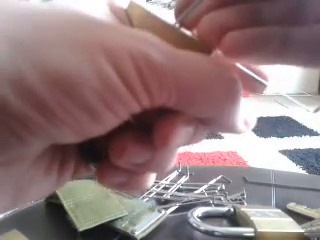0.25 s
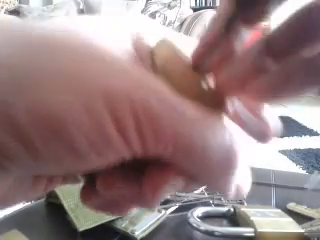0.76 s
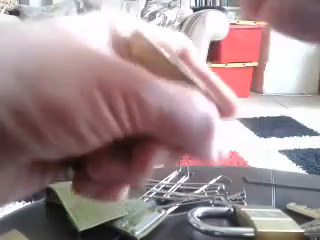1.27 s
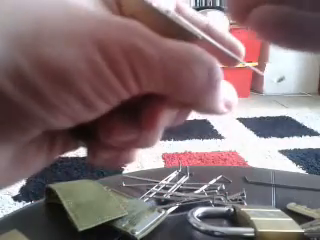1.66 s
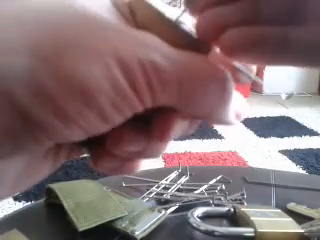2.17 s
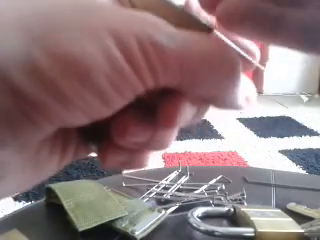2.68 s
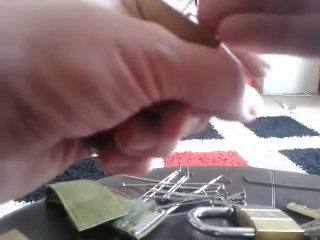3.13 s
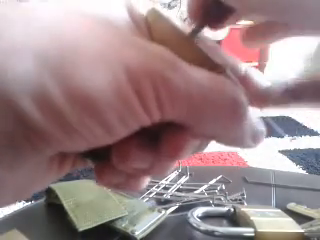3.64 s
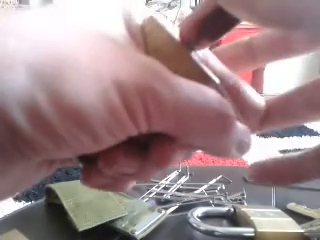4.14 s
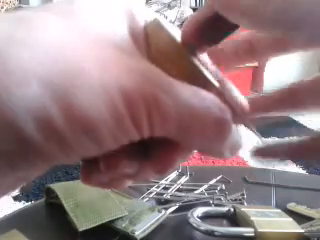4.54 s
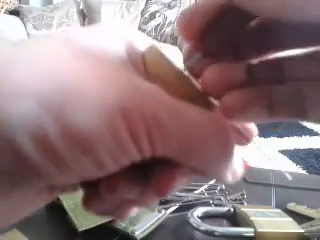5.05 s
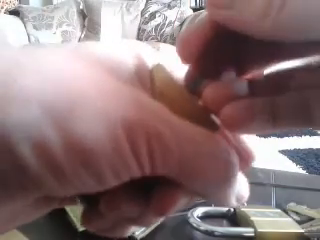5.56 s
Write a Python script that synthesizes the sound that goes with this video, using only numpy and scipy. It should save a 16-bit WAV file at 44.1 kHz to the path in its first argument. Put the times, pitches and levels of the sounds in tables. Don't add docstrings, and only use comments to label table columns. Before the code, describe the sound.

Steady soft hiss with faint low rumble and a barely audible hum runs throughout, from a cheap, band-limited microphone close to a padlock in a small room. The first second has only faint ticks at 0.3, 0.6 and 1.0. At 1.25 a tight cluster of tiny clicks and a light scrape leads to a crisp metallic snap at 1.5 and a cleaner one at 1.7. Light ticks come at 2.0-2.1, a snap at 2.44, clicks at 2.7 and a thin steel tick at 2.98. The background murmur swells slightly around 2.9 and a very faint distant engine slowly rises until 5.2. Rattling, scraping and a tiny squeak fill 3.35-3.65, with a firm click at 3.6. After a pause, clicks come at 4.5 and 4.85, with minute chirps. The loudest, very short bright snap hits at 5.03; small clicks follow at 5.2, then a strong double click at 5.45, then hiss.

```python
import sys
import numpy as np
from scipy import signal
from scipy.fft import rfft, irfft
from scipy.io import wavfile
from scipy.ndimage import uniform_filter1d

SR = 44100
rng = np.random.default_rng(int(sys.argv[2]) if len(sys.argv) > 2 else 0)


def log_audio(samples):
    frames = np.atleast_2d(samples).T
    limited = np.clip(frames, -1, 1)
    pcm = np.round(limited * 32767).astype(np.int16)
    wavfile.write(sys.argv[1], SR, pcm)


def natural_amplitude(level_db):
    exponent = np.asarray(level_db, float) / 20
    return 10 ** exponent


N = 256220

# pitch_hz, level_db (per Hz)
HISS_SPECTRUM = [(65, -54), (150, -12.5), (295, -3.5), (643, -1.5), (1790, -6), (6900, -11.5),
                 (7300, -20.5), (9000, -37)]
# pitch_hz, level_db (per Hz)
RUMBLE_SPECTRUM = [(3, -6), (22, -3.5), (45, -6), (56, -15.5), (70, -10), (80, -11.5), (92, -28.5),
                   (110, -50)]
# start_s, level_db, pitch_hz, chatter_ms
BODY_SLIPS = [(.266, -55, 1380, 3.7), (.6064, -51.5, 1510, 2.3), (1.035, -54, 1710, 2.3),
              (1.204, -56.5, 2390, 2.7), (1.248, -51.5, 2060, 5.7), (1.259, -55, 1300, 3.8),
              (1.265, -55, 1290, 1.3), (1.4983, -56, 2200, 1.1), (2.017, -55, 2300, 2.5),
              (2.1053, -54.5, 1260, 1.1), (2.429, -61, 1440, 4.1), (2.703, -46, 1450, 2.6),
              (2.704, -58, 2200, 1.8), (3.357, -51, 2390, 2.5), (3.395, -56, 1070, 3.2),
              (3.617, -42.5, 1790, 3.3), (3.6451, -49.5, 2040, 3.1), (4.459, -54, 1630, 1.4),
              (4.497, -58, 2250, 2.1), (4.5107, -53, 1840, 3.1), (4.5287, -47.5, 1870, 1.1),
              (4.856, -56.5, 1320, 4.8), (5.191, -47.5, 1850, 3.1), (5.192, -53, 1390, 1.7),
              (3.358, -53, 1500, 2.5), (1.252, -65, 1500, 3.9), (5.198, -53.5, 1930, 4.6),
              (5.4436, -41, 1910, 3.1), (5.4625, -31.5, 1820, 1.5)]
# start_s, level_db, pitch_hz, chatter_ms
PIN_SLIPS = [(1.247, -47, 2830, 6.5), (1.252, -43.5, 3850, 2.5), (1.259, -44.5, 3000, 3.6),
             (1.265, -52, 2980, 1.3), (1.4983, -44, 3760, 1.2), (2.017, -55.5, 3870, 2.4),
             (2.102, -58, 3860, 1.3), (0.6057, -59, 2820, 2.3), (2.703, -43, 3400, 1.1),
             (2.7087, -54, 2830, 1.6), (2.979, -53, 3600, 1.4), (3.357, -49, 3250, 2.7),
             (3.437, -55, 3360, 2.2), (3.456, -55.5, 3240, 4.4), (3.6182, -42, 3380, 3.2),
             (3.6192, -47, 4400, 1.2), (1.254, -57, 4600, 4.9), (3.647, -53, 3300, 5.1),
             (4.4604, -51.5, 3320, 1.3), (4.496, -57, 4170, 2.6), (4.5107, -50, 3300, 2.3),
             (4.5293, -52, 4430, 1.2), (4.848, -57, 3550, 3.1), (4.871, -57, 3450, 1.4),
             (4.889, -54.5, 3450, 3.6), (5.014, -55, 3400, 2.6), (5.022, -49.5, 3300, 1.1),
             (5.194, -70, 2500, 2.8), (5.4438, -54, 2920, 2.5)]
# start_s, level_db, pitch_hz, chatter_ms
PICK_SLIPS = [(1.248, -52.5, 6400, 6.6), (1.252, -57, 5100, 2.1), (1.4972, -53, 6000, 2.6),
              (2.017, -54.5, 6830, 2.1), (2.101, -50.5, 6350, 0.89), (2.1049, -52.5, 6800, 1.6),
              (2.318, -59.5, 6450, 8.9), (2.429, -58, 6600, 4.1), (2.703, -50, 6540, 1.8),
              (2.7082, -47, 6370, 1.4), (2.73, -56, 7100, 3.9), (2.979, -44, 6680, 2.6),
              (3.357, -49, 6620, 2.9), (3.373, -59, 6400, 5.2), (3.4375, -48, 6580, 2.9),
              (3.446, -52, 6600, 2.3), (3.615, -51, 5550, 2.8), (3.48, -58, 6540, 4.6),
              (3.607, -54, 5640, 1.9), (3.608, -52.5, 6640, 8.7), (4.4608, -52.5, 5740, 1.4),
              (4.496, -54, 6950, 2.3), (4.511, -52, 6600, 2.6), (4.5295, -49, 5400, 1.4),
              (4.849, -50.5, 5370, 2.8), (4.871, -46.5, 6470, 1.2), (4.947, -59, 6620, 2.1),
              (5.116, -57, 6400, 1.8), (5.19, -54.5, 6400, 3), (5.4434, -59, 6640, 2.5)]
# delay_ms, level_db
WALL_ECHOES = [(8, -20), (14.5, -25.5), (17.5, -16.5), (22.5, -37.5)]
# start_s, length_s, centre_hz, level_db
SCRAPES = [
    (1.243, 0.077, 4600, -65),
    (1.511, 0.049, 6270, -63),
    (2.701, 0.023, 6200, -64),
    (3.402, 0.097, 6600, -66.5),
    (3.529, .004, 5500, -60),
    (3.541, 0.0037, 6000, -59),
    (3.603, 0.044, 4400, -62),
    (4.85, .05, 5600, -66),
    (5.195, 0.015, 5550, -61.5),
]
# start_s, level_db, chatter_ms, rebound_ms, rebound_db
SNAPS = [
    (1.5001, -31, 3.6, 1.41, -17),
    (1.6898, -35.5, 1.3, 1.08, -12),
    (2.4413, -37, 1.3, .75, 10),
    (5.0256, -13, 0.69, 0.62, -21),
    (5.46, -29.5, 2.8, .6, 11),
]
# pitch_hz, width_hz, level_db
LOOSE_GRIP_MODES = [
    [(1300, 780, -7), (1750, 1000, -6), (2250, 550, -1.5), (3300, 620, -8.5), (4400, 310, -1.5),
     (5130, 480, 1.5), (5800, 420, 2.5), (6600, 860, -3)],
    [(1500, 1100, -15), (2380, 290, 4), (3300, 800, -15), (4770, 380, -7.5), (5340, 190, -5),
     (5770, 300, -7), (6730, 630, -4)],
    [(1400, 630, -2), (1910, 290, 5.5), (2380, 300, 5.5), (3040, 540, 2), (4140, 280, -9), (5040, 420, -6),
     (6550, 870, 0.5)],
]
# pitch_hz, width_hz, level_db
TIGHT_GRIP_MODES = [
    [(590, 410, -22.5), (1300, 330, -16.5), (1840, 530, -12), (2540, 310, -7), (3000, 1050, -6.5),
     (3450, 470, 1), (3870, 280, -5), (4400, 400, -1.5), (5000, 700, -20), (6230, 680, 1.5), (6640, 560, 0)],
    [(606, 660, -16), (1000, 480, -19), (1790, 790, -4.5), (2810, 410, 1), (3530, 1000, -9.5),
     (4600, 810, -20), (5600, 700, -0.5), (6350, 130, -4.5), (6840, 350, -3)],
]
# start_s, length_s, pitch_hz, level_db, octave_db
SQUEAKS = [
    (3.367, 0.015, 1334, -50, -8),
    (4.874, 0.0063, 3450, -57, -19),
    (4.887, 0.0068, 3380, -53, -13),
    (4.92, 0.0056, 520, -63.5, -30),
    (5.186, 0.019, 668, -58.5, -7),
]
# pitch_hz, gain_db
CONVERTER_LOWPASS = [(0, 0), (6900, 0), (7300, -4), (7600, -10), (7850, -22), (8100, -42), (9500, -90),
                     (SR / 2, -110)]

RUMBLE_DB, RUMBLE_FADE_DB = -73, -4.5
SWELL_S, SWELL_WIDTH_S, SWELL_DB = 2.9, .4, 2.1
MAINS_HZ, MAINS_DB, FLUTTER_HZ, FLUTTER_DB = 303, -80, 16.1, -75
FIRST_KNOCK = 2.3
ROOM_T60_S, ROOM_DB, ROOM_LOW_HZ = 0.27, -21, 1500
SEAM_S, SEAM_EVERY_S = .6065, .7
SEAM_DB, SEAM_FADE_DB = -52, -1.9
SHARP_DB = -17
SPREAD = 2.2
ENGINE_FROM_S, ENGINE_TO_S, ENGINE_HZ, ENGINE_RISE_HZ_PER_S = 2.9, 5.2, 150.5, 11.5
ENGINE_DB, ENGINE_LULL_S, ENGINE_LULL_DB = -84.5, 4.4, -8
RATE_HZ = 16000
DRIVE = 0.77


def level(x, db):
    return x * natural_amplitude(db) / np.sqrt(np.mean(x ** 2))


def burst(x, db):
    return x * natural_amplitude(db) / np.sqrt(uniform_filter1d(x ** 2, size=132).max())


def add(out, x, s):
    i = int(s * SR)
    out[i:i + len(x)] += x


def ring(x, hz, width_hz):
    r = np.exp(-np.pi * width_hz / SR)
    poles = [1, -2 * r * np.cos(2 * np.pi * hz / SR), r * r]
    return (1 - r * r) / 2 * signal.lfilter([1, 0, -1], poles, x)


def coloured(points, share=lambda hz: 1):
    hz = np.maximum(np.arange(N // 2 + 1) * SR / N, 1)
    point_hz, point_db = np.transpose(points)
    db = np.interp(np.log(hz), np.log(point_hz), point_db, right=-90)
    return irfft(rfft(rng.standard_normal(N)) * natural_amplitude(db) * share(hz), N)


def hiss():
    t = np.arange(N) / SR
    swell_db = SWELL_DB * np.exp(-((t - SWELL_S) / SWELL_WIDTH_S) ** 2)
    murmur = coloured(HISS_SPECTRUM, lambda hz: (1 + (hz / 1200) ** 2) ** -.5)
    preamp = coloured(HISS_SPECTRUM, lambda hz: (1 + (1200 / hz) ** 2) ** -.5)
    return level(murmur * natural_amplitude(swell_db) + preamp, -62)


def rumble():
    fade_db = RUMBLE_FADE_DB * np.linspace(0, 1, N)
    return level(coloured(RUMBLE_SPECTRUM), RUMBLE_DB) * natural_amplitude(fade_db)


def mains():
    return level(ring(rng.standard_normal(N), MAINS_HZ, 8.), MAINS_DB)


def supply_flutter():
    return level(ring(rng.standard_normal(N), FLUTTER_HZ, 0.5), FLUTTER_DB)


def chatter(chance, ms, first, sparse=1.52):
    t_ms = np.arange(len(chance)) / SR * 1000
    knocks = np.sign(chance) * np.minimum(np.abs(chance), 2.2) ** sparse
    knocks[0] = 4 * first
    return knocks * np.exp(-(t_ms / max(ms, .3)) ** 2)


def body(x, hz):
    clack = ring(ring(x, 1600, 1600), 1700, 1600)
    return ring(x, hz, 340) + natural_amplitude(-8) * clack


def pin(x, hz):
    return ring(x, hz, 310) + natural_amplitude(-11.0) * ring(x, 4200, 2400)


def pick(x, hz):
    clack = ring(ring(x, 6800, 2100), 6200, 2400)
    return ring(x, hz, 340) + natural_amplitude(-22.5) * clack


def slips():
    out = np.zeros(N)
    for part, table in ((body, BODY_SLIPS), (pin, PIN_SLIPS), (pick, PICK_SLIPS)):
        chances = rng.standard_normal((len(table), 1024))
        for chance, (s, db, hz, ms) in zip(chances, table):
            knocks = chatter(chance, ms, FIRST_KNOCK)
            add(out, burst(part(knocks, hz), db), s)
    return out


def room(x):
    t = np.arange(SR // 2) / SR
    noise = rng.standard_normal(len(t))
    grow_in = np.clip((t - .006) / 0.0043, 0, 1)
    shape = natural_amplitude(ROOM_DB - 29.0 - 60 * t / ROOM_T60_S) * grow_in
    for ms, db in WALL_ECHOES:
        shape = shape + natural_amplitude(db - 30.5) * np.exp(-((t * 1000 - ms) / 1.1) ** 2)
    tail = signal.lfilter(*signal.butter(1, ROOM_LOW_HZ, "high", fs=SR), noise * shape)
    hard_walls = natural_amplitude(-3.5) * ring(tail, 4100, 1700)
    air_loss = .3 * (1 - np.exp(-t / .02)) * ring(tail, 5300, 1500)
    return signal.fftconvolve(x, tail + hard_walls - air_loss)[:N]


def seams():
    out = np.zeros(N)
    step = -np.exp(-np.arange(400) / SR / 0.00086)
    for k, s in enumerate(np.arange(SEAM_S, N / SR, SEAM_EVERY_S)):
        add(out, natural_amplitude(SEAM_DB + k * SEAM_FADE_DB) * step, s)
    return out


def scrape():
    out = np.zeros(N)
    chances = rng.standard_normal((len(SCRAPES), 4096))
    for chance, (s, length, hz, db) in zip(chances, SCRAPES):
        grit = chance[:int(length * SR)] ** 3
        u = np.linspace(0, 1, len(grit))
        stroke = u ** 0.12 * (1 - u)
        add(out, level(ring(grit * stroke, hz, 2900), db), s)
    return out


def snap():
    out = np.zeros((2, N))
    chances = rng.standard_normal((len(SNAPS), 1024))
    grips = LOOSE_GRIP_MODES + TIGHT_GRIP_MODES
    for chance, (s, db, ms, rebound_ms, rebound_db), modes in zip(chances, SNAPS, grips):
        blow = chatter(0.13 * chance, ms, first=1.5)
        blow[int(rebound_ms * SR / 1000)] += blow[0] * natural_amplitude(rebound_db)
        near, sides = 0, 0
        for k, (hz, width_hz, mode_db) in enumerate(modes):
            gain = (-1) ** k * natural_amplitude(mode_db)
            swelling = ring(blow, hz, width_hz) + natural_amplitude(SHARP_DB) * blow
            near = near + gain * ring(swelling, hz, width_hz)
            sides = sides + gain * ring(blow, hz, SPREAD * width_hz)
        add(out[0], burst(near, db), s)
        add(out[1], burst(sides, db), s)
    return out


def engine():
    t = np.arange(N) / SR
    hz = ENGINE_HZ + ENGINE_RISE_HZ_PER_S * (t - ENGINE_FROM_S)
    db = ENGINE_DB + ENGINE_LULL_DB * np.exp(-((t - ENGINE_LULL_S) / .2) ** 2)
    heard = np.clip(np.minimum(t - ENGINE_FROM_S, ENGINE_TO_S - t) / .05, 0, 1)
    tone = np.sin(2 * np.pi * np.cumsum(hz) / SR)
    return np.sqrt(2) * natural_amplitude(db) * heard * tone


def squeak():
    out = np.zeros(N)
    for s, length, hz, db, octave_db in SQUEAKS:
        n = int(length * SR)
        phase = 2 * np.pi * np.cumsum(hz * np.linspace(.97, 1.04, n)) / SR
        tone = np.sin(phase) + natural_amplitude(octave_db) * np.sin(2 * phase)
        add(out, burst(tone * np.hanning(n), db), s)
    return out


def scene():
    floor = hiss() + rumble() + mains() + supply_flutter() + seams() + engine()
    light = slips() + scrape() + squeak()
    near, sides = snap()
    return (light + near + room(light + sides) + floor)[None]


def causal(points):
    hz, db = np.transpose(points)
    cepstrum = irfft(np.log(natural_amplitude(np.interp(np.linspace(0, SR / 2, 1025), hz, db))))
    cepstrum[1:1024] *= 2
    cepstrum[1025:] = 0
    return irfft(np.exp(rfft(cepstrum)))[:512]


def low_pass(x):
    return signal.sosfilt(signal.butter(12, 19000, fs=SR, output="sos"), x)


def record(dry):
    rounded = np.tanh(DRIVE * dry) / DRIVE
    x = signal.fftconvolve(rounded, causal(CONVERTER_LOWPASS)[None])[:, :N]
    mirror = x * np.cos(2 * np.pi * RATE_HZ * np.arange(N) / SR)
    image_band = signal.cheby2(6, 50, [7500, 9100], "band", fs=SR, output="sos")
    mirror = signal.sosfilt(image_band, mirror)
    return low_pass(x + natural_amplitude(-13.0) * mirror - .0003)


dry = scene()
out = record(dry)
log_audio(out)
```